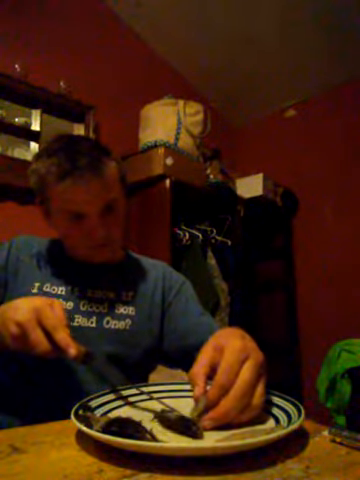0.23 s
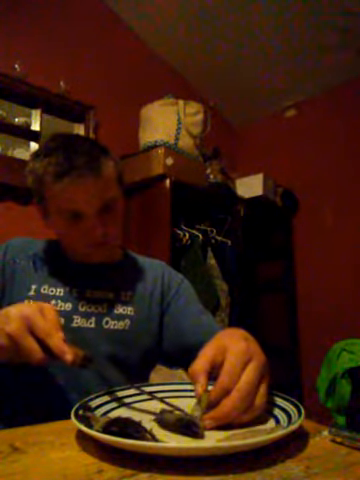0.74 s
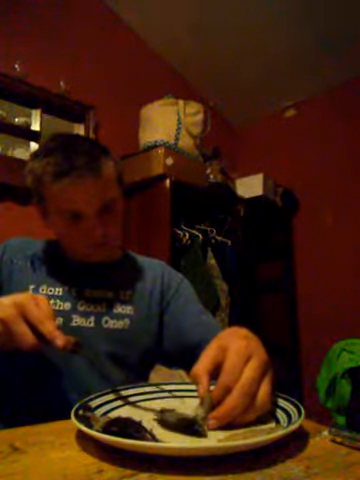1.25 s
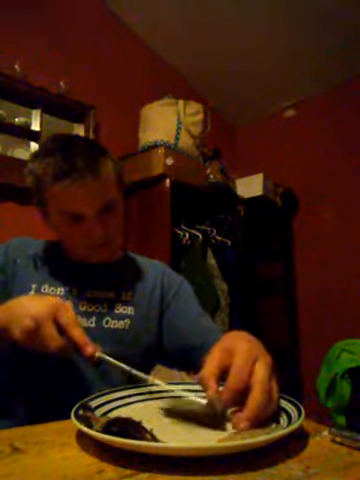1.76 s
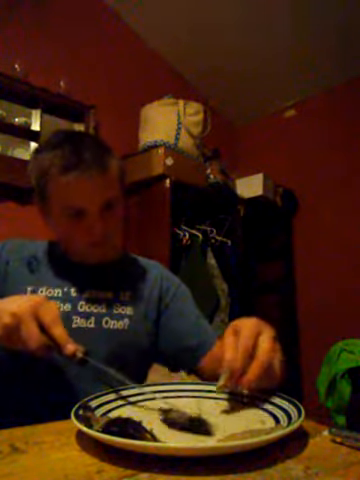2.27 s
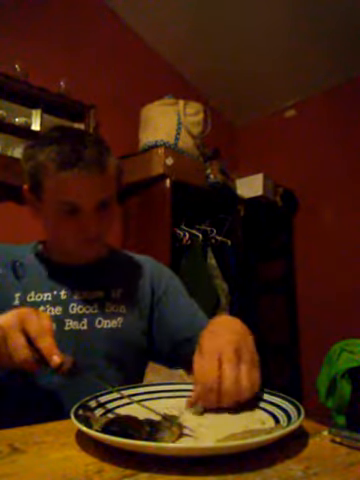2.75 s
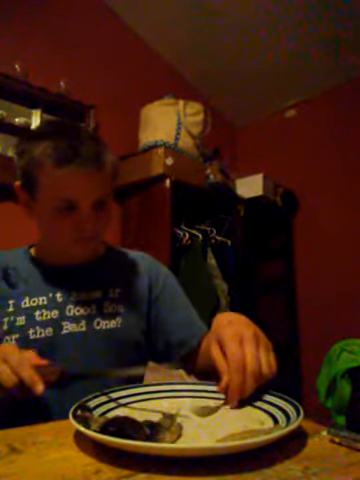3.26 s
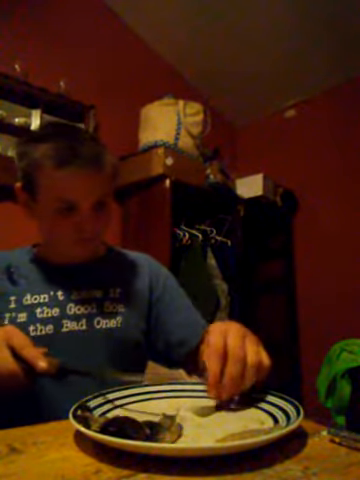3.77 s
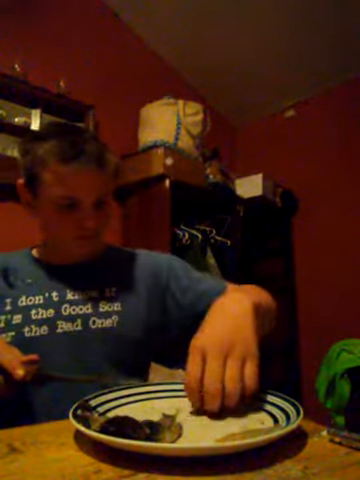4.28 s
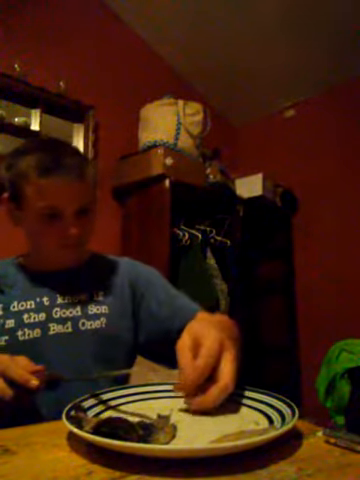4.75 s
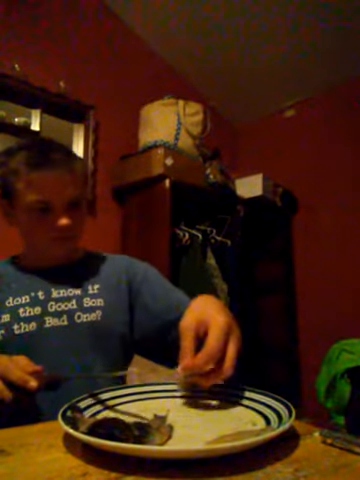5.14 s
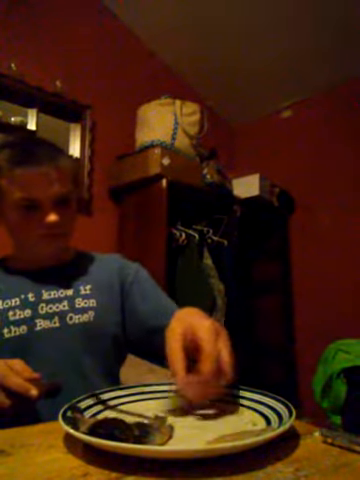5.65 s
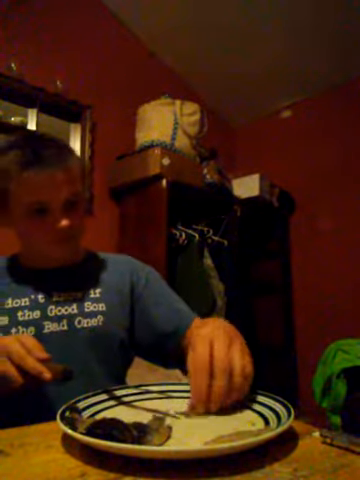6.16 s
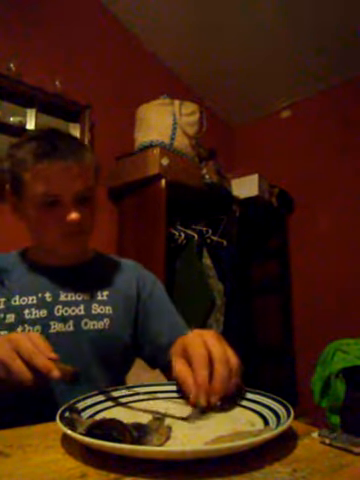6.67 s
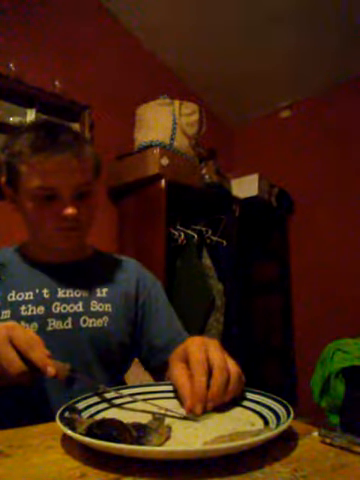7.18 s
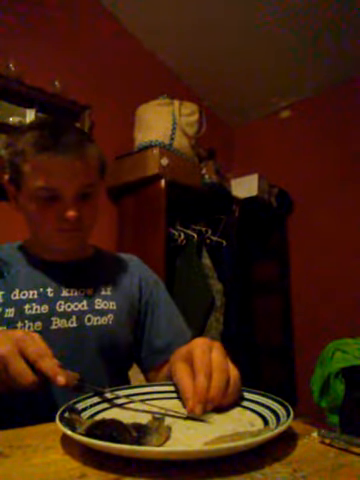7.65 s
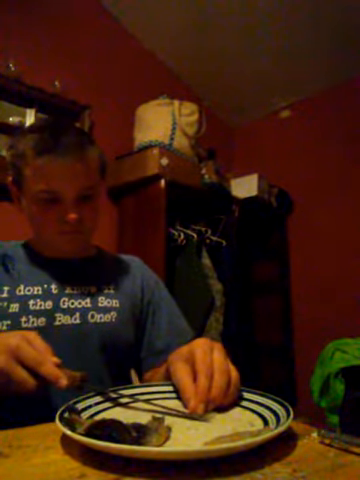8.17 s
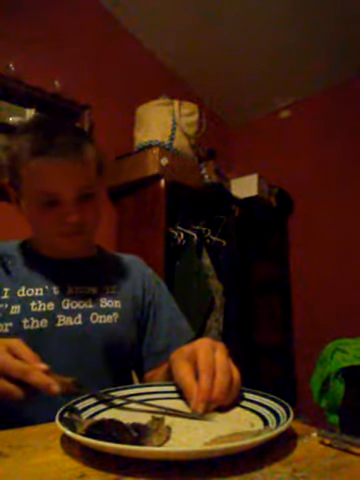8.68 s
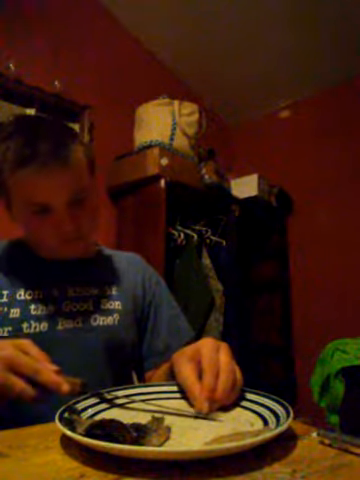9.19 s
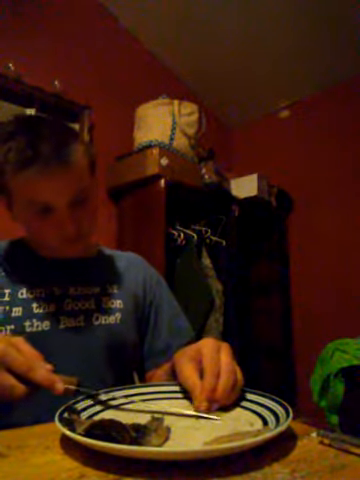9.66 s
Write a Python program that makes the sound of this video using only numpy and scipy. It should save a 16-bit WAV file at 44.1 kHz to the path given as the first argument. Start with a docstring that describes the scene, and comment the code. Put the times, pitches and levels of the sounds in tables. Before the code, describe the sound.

Cutlery on a dinner plate up close: quick knife clicks and tiny squeaks, one sharp fork clank, then scattered softer taps, knocks and short scrapes.

```python
"""A wooden table in a small room: someone cuts up food on a china plate, close to a little camera.
Knife and fork ring decaying modes of the loaded plate, with noise bursts for the most damped ones.
Strokes scrape as runs of tiny slips, squeaks are gliding whistles, and thuds ring the plate on the table.
Crisp food ticks as short noise bursts, and a sleeve rustles as coloured noise that follows the arm.
The camera hisses softly and turns its treble down whenever little is going on there."""
import sys
import numpy as np
from scipy import signal
from scipy.fft import rfft, irfft
from scipy.io import wavfile
from scipy.ndimage import uniform_filter1d

SR = 44100
rng = np.random.default_rng(int(sys.argv[2]) if len(sys.argv) > 2 else 0)


def dump(signal):
    """Clip the signal to [-1, 1] and save it as 16-bit WAV at the path in sys.argv[1]."""
    limited = np.clip(np.atleast_2d(signal).T, -1, 1)
    pcm = np.round(limited * 32767).astype(np.int16)
    wavfile.write(sys.argv[1], SR, pcm)


N = 437472
TIME = np.arange(N) / SR
AGE = TIME[:SR * 3 // 5]  # time since a contact [s]

# Event levels are set before each layer's own gain; mode and spectrum levels are relative.
# the arm reaches across the table: (start [s], length [s], sleeve level [dB])
ARM_REACHES = [(0.793, 0.26, -60), (1.64, 0.51, -55), (2.32, 0.36, -60.5), (2.909, 0.49, -54.5),
               (4.946, 0.78, -53.5), (6.976, 0.57, -63.5), (8.625, 0.47, -65.5)]
# cloth and hand noise: (frequency [Hz], level [dB per Hz])
SLEEVE_SPECTRUM = [(60, -4.5), (130, -14.5), (230, 9), (700, 7), (1100, 3.5), (2400, 2.5), (4000, -3),
                   (4500, -27), (6300, -21), (12000, -14.5)]
# background noise of the camera: (frequency [Hz], level [dB per Hz])
HISS_SPECTRUM = [(25, -1), (60, -9.5), (120, -16), (230, 4), (380, -1), (520, -5), (700, -0.5),
                 (1300, -9.5), (1700, 4.5), (2100, -10.5), (4000, -10.5), (4400, -25.5), (9000, -26.5),
                 (16000, -33)]
# small ticks of tines and crisp food: (time [s], level [dB])
FOOD_TICKS = [(0.068, -49.5), (0.207, -44), (2.473, -43.5), (2.915, -38), (3.681, -33.5), (4.911, -35.5),
              (4.947, -39), (7.0823, -40), (7.215, -44.5), (7.3018, -38.5)]
# dense short-lived modes of a tick: (frequency [Hz], level [dB per Hz])
TICK_SPECTRUM = [(150, -20), (700, 0), (1300, -5.5), (2200, 0.5), (3500, 3), (4100, -8.5), (4500, -30),
                 (7000, -13.5), (15000, -34)]
# knife strokes: (start [s], length [s], body [dB], ring [dB], edge [dB], mode favoured by the spot [Hz])
KNIFE_CUTS = [(.14, 0.11, -54, -59, -57, 1940), (.37, 0.028, -50, -41.5, -45, 1140),
              (.426, 0.012, -64, -47, -47, 3480), (1.125, 0.057, -47, -42.5, -43, 1167),
              (1.764, 0.056, -44, -42.5, -45, 1920), (1.818, 0.03, -43, -44, -38.5, 3150),
              (2.248, 0.077, -43.5, -41.5, -50, 1106)]
# the plate with the knife on it: (frequency [Hz], level [dB], t60 [s])
KNIFE_PLATE_MODES = [(363.4, 2, 0.11), (674, 4.5, 0.088), (1140, -4, 0.24), (1174, -10, 0.29),
                     (1212, -10.5, 0.27), (1948, 2.5, 0.11), (2745, -35, .2), (2950, -8.5, 0.21),
                     (3040, 8.5, 0.062), (3562, 4, 0.088), (3530, -5, 0.16), (3960, 3.5, 0.097),
                     (4940, -15, 0.15), (5570, -26, .2), (6170, -15, 0.26), (7203, -51, .25),
                     (8030, -16, 0.31), (10000, -23, .2)]
# dense short-lived modes under the knife: (frequency [Hz], level [dB per Hz])
KNIFE_CRACK_SPECTRUM = [(100, -65), (300, 5), (500, -15), (800, -0.5), (2200, 4), (3300, 12), (4050, 12),
                        (4500, -46), (5300, -19), (6300, -12), (8000, -16), (15000, -32)]
# the knife steel singing as it slides: (frequency [Hz], level [dB], t60 [s])
KNIFE_STEEL_MODES = [(5260, -5.5, 0.054), (6370, -6, .05), (7360, 0, .03), (7990, -5, 0.062),
                     (10200, -10, .04)]
# noise of steel sliding on glaze: (frequency [Hz], level [dB per Hz])
SIZZLE_SPECTRUM = [(4000, -30), (4700, -41), (5300, -34), (5900, -15), (6700, -1), (7400, 8.5), (8200, 7.5),
                   (9300, -2), (10300, 0), (12000, -16), (15500, -33)]
# knife blows: (time [s], body [dB], ring [dB], edge [dB], mode favoured by the spot [Hz])
KNIFE_BLOWS = [(0.3492, -32, -37.5, -31, 3060), (.359, -29, -38, -35.5, 678),
               (0.4245, -56, -43.5, -44.5, 3420), (1.109, -30.5, -40.5, -33, 371.3),
               (1.776, -47, -37, -45, 1940), (1.988, -54, -55, -49.5, 3940), (2.003, -52, -58, -45, 3940),
               (2.086, -69, -51, -44.5, 2940), (2.238, -39.5, -32, -32, 2000),
               (2.2846, -43, -42, -35.5, 1130)]
# the blade squeaks as it slips: (time [s], length [s], starting pitch [Hz], level [dB])
BLADE_SQUEAKS = [(0.432, 0.011, 3300, -39.5), (1.193, 0.016, 3600, -40), (2.084, 0.0176, 3130, -44)]
# fork blows: (time [s], body [dB], ring [dB], edge [dB], mode favoured by the spot [Hz])
FORK_BLOWS = [(3.429, -22, -20.5, -25, 1804), (3.941, -40, -53.5, -55.5, 4220),
              (3.956, -33, -47, -42.5, 1116), (5.7364, -37, -37.5, -37, 2492),
              (5.921, -35.5, -42.5, -49, 700), (6.129, -40.5, -50, -50.5, 2940),
              (6.537, -39, -38.5, -48, 1750), (7.691, -45.5, -54, -55, 586), (8.162, -49.5, -53, -56, 2900),
              (9.14, -33.5, -47, -44, 3305), (9.417, -43.5, -46, -47.5, 666)]
# the plate with the fork on it: (frequency [Hz], level [dB], t60 [s] before the fingers' damping)
FORK_PLATE_MODES = [(251.4, -16.5, 0.11), (338.8, -9, 0.16), (379.4, -3, 0.092), (444.4, -15, 0.27),
                    (588.5, -19.5, 0.34), (661, 2.5, 0.044), (1114, -17.5, 0.21), (1541, -7.5, 0.45),
                    (1778, 4, 0.16), (1875, 6.5, 0.19), (1933, -2, 0.41), (2494, -6, 0.18),
                    (2630, -24, .18), (2900, -9.5, 0.18), (3337, -1, 0.2), (3790, -11.5, 0.33),
                    (4200, -21, .2), (5220, -26, 0.32), (6272, -27.5, 0.3), (7434, -27, 0.46),
                    (8730, -38, 0.49)]
# dense short-lived modes under the fork: (frequency [Hz], level [dB per Hz])
FORK_CRACK_SPECTRUM = [(60, -17), (150, -25), (300, 5), (430, 1.5), (520, -17), (700, 4), (1000, -14.5),
                       (1700, 9), (2800, -3), (4100, 3), (4600, -25.5), (7500, -22.5), (10000, -45),
                       (15000, -64)]
# the plate pressed against the table: (time [s], level [dB])
PLATE_THUDS = [(3.432, -31.5), (3.665, -35), (3.708, -35), (4.872, -38.5), (5.101, -50), (5.425, -35),
               (5.625, -47.5), (6.005, -54), (6.258, -52.5), (6.358, -55.5), (7.795, -57), (8.932, -52.5),
               (9.233, -44.5), (9.379, -42), (9.662, -44)]
# the plate on the table top: (frequency [Hz], level [dB], t60 [s])
TABLE_PLATE_MODES = [(59.1, -26.5, 0.71), (182, -13, 0.18), (252.2, -6, 0.16), (343, -6.5, 0.13),
                     (424, 2, 0.064), (619, -5, 0.098), (675, 4, 0.051), (770, -9.5, 0.12)]
# dense short-lived modes of a thud: (frequency [Hz], level [dB per Hz])
THUD_SPECTRUM = [(40, -32), (135, -30), (175, -1), (420, 1.5), (750, 1.5), (1100, -10.5), (3800, -19),
                 (4600, -52)]
# fork strokes: (start [s], length [s], body [dB], ring [dB], edge [dB], mode favoured by the spot [Hz])
FORK_DRAGS = [(4.48, 0.12, -48.5, -52, -57.5, 675), (5.76, 0.081, -52.5, -45.5, -45, 2492),
              (8.08, 0.12, -49, -53, -63.5, 1120)]
# the fork steel singing as it slides: (frequency [Hz], level [dB], t60 [s])
FORK_STEEL_MODES = [(7430, -2, 0.084), (8700, -9, 0.06)]
# the knife pushed flat across the plate:
# (start [s], length [s], body [dB], ring [dB], edge [dB], mode favoured by the spot [Hz])
FLAT_SWEEPS = [(9.16, 0.138, -39, -42, -45, 3200), (9.275, 0.0906, -38, -38, -38.5, 3307)]
# the plate under the flat blade: (frequency [Hz], level [dB], t60 [s])
FLAT_BLADE_MODES = [(317, -6, 0.2), (444, -7.5, 0.18), (669.6, 4, 0.14), (1177, -11.5, 0.085),
                    (1253, -4, 0.078), (1780, -6.5, 0.059), (2456, -13, 0.11), (3040, 0, 0.047),
                    (3255, -20, 0.2), (3397, 0, 0.045), (3660, -28, .12), (5300, -33, .16),
                    (6930, -12, 0.071), (7080, -13.5, 0.086), (8680, -24, .1)]

BODY_HZ, RING_HZ = 1000, 2700  # low body lies below the first, china ring between, steel edge above
TOP_HZ = 15750  # the camera passes nothing much above this
SQUEAK_TOP_HZ = 4000  # blade resonance that the squeaks climb towards
REACH_EASE_S = 0.11  # the arm speeds up and slows down over this time
FIDGET_DB = -68.5  # the sleeve between movements
# the hand follows through after a blow: level, time to its peak, dB gained per dB of the blow
FOLLOW_DB, FOLLOW_S, FOLLOW_SHARE = -59.5, 0.075, 0.55
ROCK_S, ROCK_DB = 0.016, -6  # the plate rocks back after a thud: time to each rebound, and its loss
# softer strokes ride on food and lose their sizzle: threshold, dB lost per dB below it
BARE_GLAZE_DB, CUSHION = -51, 4


def undb(db):
    """Decibels to gain."""
    return 10 ** (np.asarray(db) / 20)


def unit(x, size=None):
    """Scale to rms 1 over the first samples."""
    return x / np.sqrt(np.mean(x[:size] ** 2) + 1e-18)


def add(track, s, sound):
    """Mix a sound in at a time."""
    start = max(int(s * SR), 0)
    track[start:start + len(sound)] += sound[:N - start]


def band(x, hz, kind, order=4):
    """Butterworth filter."""
    return signal.sosfilt(signal.butter(order, hz, kind, fs=SR, output="sos"), x)


def colour(x, spectrum):
    """Shape a sound by (Hz, dB) points; rms 1."""
    hz, db = np.transpose(spectrum)
    bins = np.maximum(np.fft.rfftfreq(len(x), 1 / SR), 1)
    gain = undb(np.interp(np.log(bins), np.log(hz), db))
    return unit(irfft(rfft(x) * gain, len(x)))


def noise(spectrum, size):
    """Coloured noise, rms 1."""
    return colour(rng.standard_normal(size), spectrum)


def walk(rate, size):
    """A smooth random wander with spread near 1, through a given rate of fresh values per second."""
    steps = np.arange(size) / SR * rate
    return np.interp(steps, np.arange(size), rng.standard_normal(size))


def fade(t60):
    """Exponential decay by 60 dB in t60 seconds."""
    return np.exp(-np.log(1000) * AGE / t60)


def onset(rise_s):
    """Sound builds up as the first reflections from the table arrive."""
    return 1 - np.exp(-(AGE / rise_s) ** 2)


def ring(modes, spot_hz=1, spot_db=5, uneven_db=0.5, detune=0.00061):
    """Decaying modes; the spot struck favours some of them, and the steel loads each a little differently."""
    hz, db, t60 = np.transpose(modes)[:, :, None]
    weight, load, phase = rng.standard_normal((3, len(modes), 1))
    favour = spot_db * np.exp(-(np.log(hz / spot_hz) / 0.024) ** 2)
    waves = np.sin(2 * np.pi * (hz * (1 + detune * load) * AGE + phase))
    gains = undb(db + favour + uneven_db * weight)
    return unit(np.sum(gains * fade(t60) * waves, axis=0), size=1024)


def crack(spectrum, t60, room_db, room_t60=0.5):
    """The crowd of quickly damped modes at a contact, and its wash round the room."""
    decay = fade(t60) + undb(room_db) * fade(room_t60)
    return unit(noise(spectrum, len(AGE)) * decay, size=1024)


def contact(x, body_db, ring_db, edge_db, size, body_rise_s=0.0067):
    """Weight and hardness set how much low body, china ring and steel edge wake; the body comes late."""
    late = x * (1 - np.exp(-TIME[:len(x)] / body_rise_s))
    body = band(late, (160, BODY_HZ), "band")
    china = band(x, (BODY_HZ, RING_HZ), "band")
    edge = band(x, RING_HZ, "high")
    levels = zip((body_db, ring_db, edge_db), (body, china, edge))
    return sum(undb(db) * unit(part, size=size) for db, part in levels)


def slips(rate, spread_db, size):
    """Stick and slip: a random run of clicks of uneven strength, at a mean rate per second."""
    chance, strength = rng.random(size), rng.standard_normal(size)
    return (chance < rate / SR) * undb(spread_db * strength) * rng.choice([-1, 1], size)


def arm_motion(fidget_spread_db=1.0):
    """How strongly the sleeve moves: it fidgets, swells with each reach and follows through after blows."""
    power = undb(FIDGET_DB + fidget_spread_db * walk(6, N)) ** 2
    for s, length, db in ARM_REACHES:
        ease = np.clip(np.minimum(TIME - s, s + length - TIME) / REACH_EASE_S, 0, 1)
        power += (undb(db) * ease) ** 2
    blows = [(s, max(levels)) for s, *levels, _ in KNIFE_BLOWS + FORK_BLOWS]
    usual_db = np.mean([db for _, db in blows])
    swing = (AGE / FOLLOW_S * np.exp(1 - AGE / FOLLOW_S)) ** 2
    for s, db in blows:
        follow_db = FOLLOW_DB + FOLLOW_SHARE * (db - usual_db)
        add(power, s, (undb(follow_db) * swing) ** 2)
    return np.sqrt(power)


def rustle(gain_db=2, crumbs_db=-14, flutter_db=2.0):
    """Cloth and hand brush along as fluttering noise while food crackles faintly under the tines."""
    cloth = noise(SLEEVE_SPECTRUM, N) * undb(flutter_db * walk(60, N))
    crackle = crack(TICK_SPECTRUM, t60=0.018, room_db=-37)
    crumbs = signal.fftconvolve(slips(60, 2.5, N), crackle)[:N]
    crumbs = colour(crumbs, SLEEVE_SPECTRUM)
    return undb(gain_db) * arm_motion() * (cloth + undb(crumbs_db) * crumbs)


def hiss(level_db=-60, flicker_db=5.0):
    """Quiet background of coloured noise; all but its treble flickers."""
    air = noise(HISS_SPECTRUM, N)
    low = signal.sosfiltfilt(signal.butter(6, 4300, fs=SR, output="sos"), air)
    flicker = undb(flicker_db * walk(110, N))
    return undb(level_db) * (air + low * (flicker - 1))


def ticks(gain_db=-5):
    """Tiny dry contacts, too light to ring the plate."""
    out = np.zeros(N)
    for s, db in FOOD_TICKS:
        tick = onset(0.0016) * crack(TICK_SPECTRUM, t60=0.017, room_db=-21.5)
        add(out, s, undb(db) * tick)
    return undb(gain_db) * out


def scrapes(strokes, modes, spectrum, steel_modes, gain_db, crack_db, sizzle_db, steel_db):
    """Steel dragged over the glaze: each slip rings the plate and the steel, and sizzles at the edge."""
    out = np.zeros(N)
    for s, length, *levels, spot_hz in strokes:
        bright_db = max(levels[1:])
        fizz_db = bright_db - CUSHION * max(BARE_GLAZE_DB - bright_db, 0)
        size = int(length * SR)
        drive = slips(1800, 3.5, size) * signal.windows.tukey(size, 0.3)
        clatter = crack(spectrum, t60=0.051, room_db=-15.5)
        plate = ring(modes, spot_hz, spot_db=22) + undb(crack_db) * clatter
        add(out, s, contact(signal.fftconvolve(drive, plate), *levels, size=size))
        fizz = crack(SIZZLE_SPECTRUM, t60=0.027, room_db=-17.5)
        sizzle = signal.fftconvolve(drive, fizz + undb(steel_db) * ring(steel_modes))
        add(out, s, undb(fizz_db + sizzle_db) * unit(sizzle, size=size))
    return undb(gain_db) * out


def knife(gain_db=-1, crack_db=2, snap_hz=5300, snap_db=-8, hardening=0.91):
    """The blade breaks through to the plate; the bright snap of the steel falls off fast on softer blows."""
    out = np.zeros(N)
    hardest_db = max(row[3] for row in KNIFE_BLOWS)
    for s, body_db, ring_db, edge_db, spot_hz in KNIFE_BLOWS:
        clatter = crack(KNIFE_CRACK_SPECTRUM, t60=0.042, room_db=-34.5)
        blow = ring(KNIFE_PLATE_MODES, spot_hz, spot_db=9.5) + undb(crack_db) * clatter
        add(out, s, contact(blow * onset(0.00066), body_db, ring_db, edge_db, size=768, body_rise_s=0.0088))
        burst = rng.standard_normal(len(AGE)) * fade(0.031)
        snap = band(burst, (snap_hz - 400, snap_hz + 400), "band", order=3)
        softness_db = hardening * (edge_db - hardest_db)
        add(out, s, undb(edge_db + snap_db + softness_db) * unit(snap, size=256))
    return undb(gain_db) * out


def squeaks(gain_db=-1, rough=0.018):
    """The slips lock into a brief, slightly rough whistle that climbs towards a resonance of the blade."""
    out = np.zeros(N)
    for s, length, start_hz, db in BLADE_SQUEAKS:
        size = int(length * SR)
        hz = SQUEAK_TOP_HZ + (start_hz - SQUEAK_TOP_HZ) * np.exp(-AGE[:size] / 0.00526)
        phase = np.cumsum(hz * (1 + rough * walk(1120, size))) / SR
        whistle = np.sin(2 * np.pi * phase) * signal.windows.tukey(size, 0.2)
        add(out, s, undb(db) * unit(whistle))
    return undb(gain_db) * out


def fork(gain_db=0, clatter_db=-5, light_t60=0.2, freeing=0.062):
    """The fork drops on the plate; hard blows ring freely, while after light ones the fingers damp it."""
    out = np.zeros(N)
    lightest_db = min(row[2] for row in FORK_BLOWS)
    for s, body_db, ring_db, edge_db, spot_hz in FORK_BLOWS:
        damping = fade(light_t60 * np.exp(freeing * (ring_db - lightest_db)))
        clatter = crack(FORK_CRACK_SPECTRUM, t60=0.042, room_db=-23)
        plate = ring(FORK_PLATE_MODES, spot_hz, spot_db=9.0, detune=0.0006) * damping
        blow = plate + undb(clatter_db) * clatter
        add(out, s, contact(blow * onset(0.0012), body_db, ring_db, edge_db, size=1024))
    return undb(gain_db) * out


def thuds(gain_db=0, crack_db=-1, rise_s=0.0046):
    """Blows cushioned by food only rock the plate on the table; it settles in ever weaker rebounds."""
    out = np.zeros(N)
    for s, db in PLATE_THUDS:
        for rebound in range(3):
            knock = crack(THUD_SPECTRUM, t60=0.06, room_db=-21)
            blow = ring(TABLE_PLATE_MODES) + undb(crack_db) * knock
            thud = unit(blow * onset(rise_s), size=1024)
            add(out, s + rebound * ROCK_S, undb(db + rebound * ROCK_DB) * thud)
    return undb(gain_db) * out


def room(x, wet_db=-11, t60=0.4, gap_s=0.0045):
    """A small furnished room answers within a few milliseconds, as a decaying noise tail."""
    tail = rng.standard_normal(len(AGE)) * fade(t60) * (AGE > gap_s)
    return x + undb(wet_db) * signal.fftconvolve(x, tail / np.linalg.norm(tail))[:N]


def scene():
    """All that happens on and around the plate; the rustle is close and gets no room tail."""
    cuts = scrapes(KNIFE_CUTS, KNIFE_PLATE_MODES, KNIFE_CRACK_SPECTRUM, KNIFE_STEEL_MODES,
                   gain_db=-2, crack_db=2.5, sizzle_db=-8.5, steel_db=-2)
    drags = scrapes(FORK_DRAGS, FORK_PLATE_MODES, FORK_CRACK_SPECTRUM, FORK_STEEL_MODES,
                    gain_db=-3, crack_db=8.5, sizzle_db=-7.5, steel_db=6)
    sweeps = scrapes(FLAT_SWEEPS, FLAT_BLADE_MODES, KNIFE_CRACK_SPECTRUM, KNIFE_STEEL_MODES,
                     gain_db=-3.5, crack_db=-7.5, sizzle_db=-12, steel_db=-3)
    plate = ticks() + cuts + knife() + squeaks() + fork() + thuds() + drags + sweeps
    return (room(plate) + rustle())[None]


def treble_gate(x, edge_hz, threshold_db, shut_db):
    """What lies above the edge is turned down unless it is loud, so bright tails stop short."""
    treble = signal.sosfiltfilt(signal.butter(12, edge_hz, "high", fs=SR, output="sos"), x)
    is_open = uniform_filter1d(treble ** 2, size=768) > undb(threshold_db) ** 2
    shut = 1 - uniform_filter1d(is_open * 1.0, size=96)  # short crossfade
    return x - treble * shut * (1 - undb(shut_db))


def record(dry, low_cut_hz=42):
    """The camera gates its treble in two steps, adds its own hiss and cuts the deep bass and the top."""
    gated = treble_gate(dry[0], 6600, threshold_db=-60, shut_db=-12)
    gated = treble_gate(gated, 4500, threshold_db=-63, shut_db=-5)
    thinned = band(gated + hiss(), low_cut_hz, "high", order=2)
    top_cut = signal.ellip(10, 0.2, 70, TOP_HZ, fs=SR, output="sos")
    return signal.sosfilt(top_cut, thinned)[None]


dry = scene()
out = record(dry)
dump(out)
```